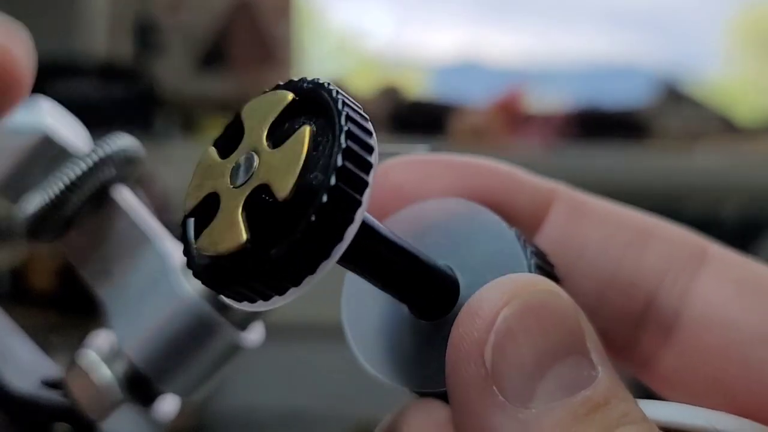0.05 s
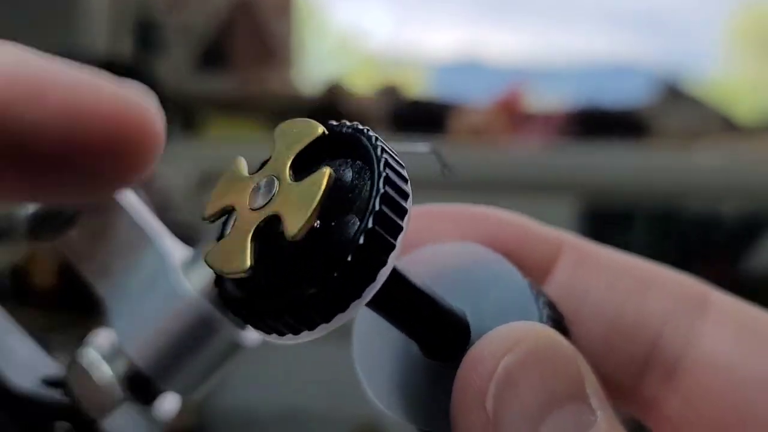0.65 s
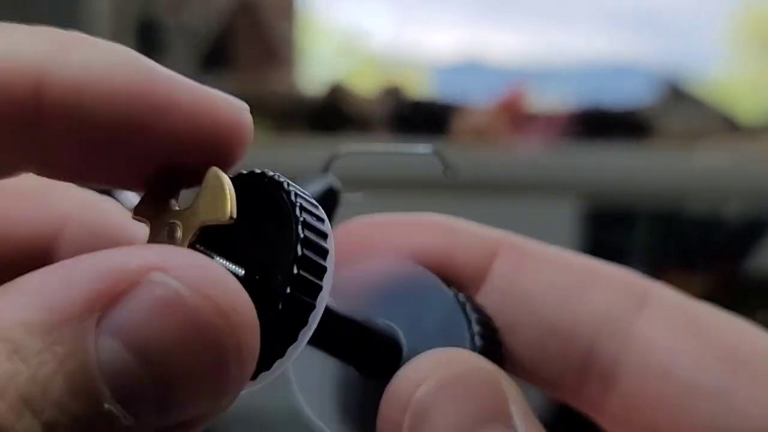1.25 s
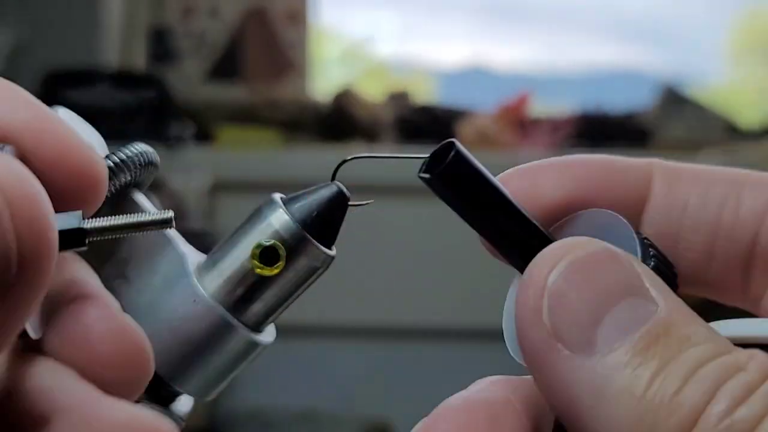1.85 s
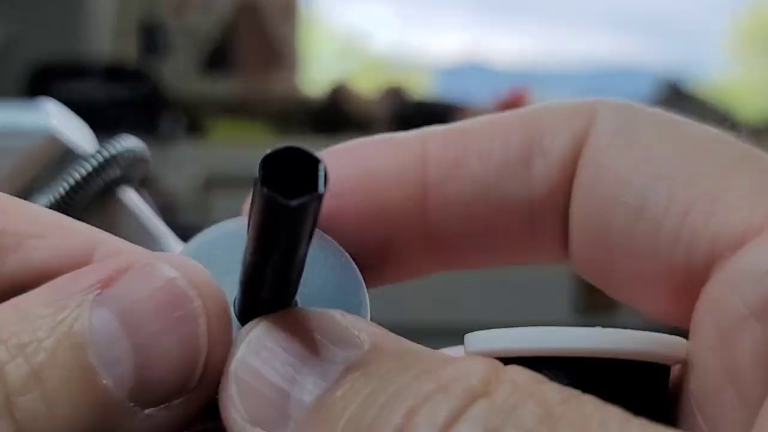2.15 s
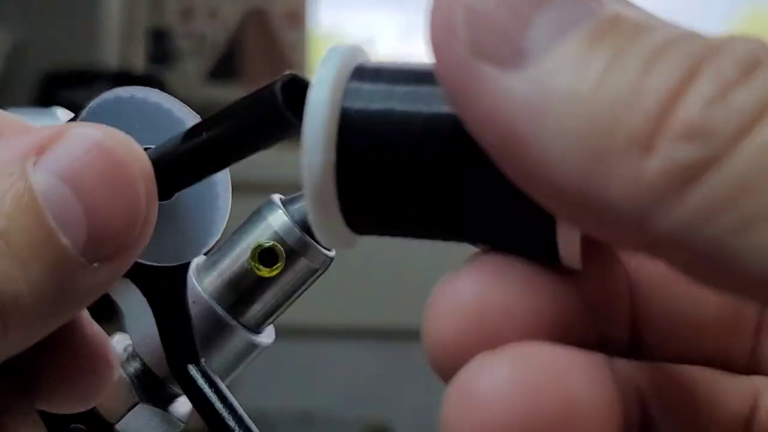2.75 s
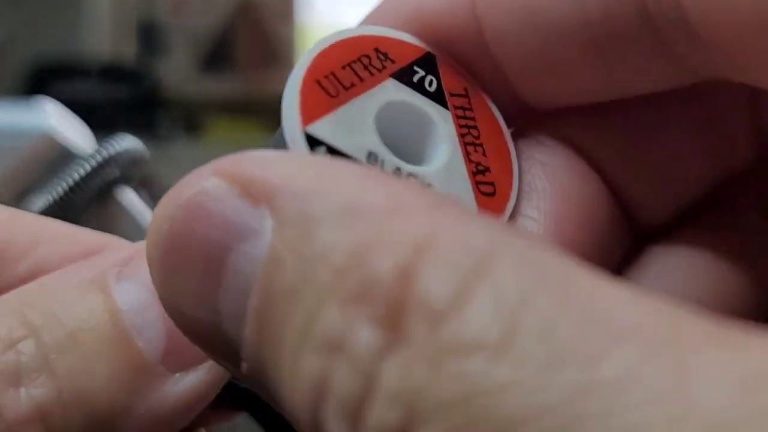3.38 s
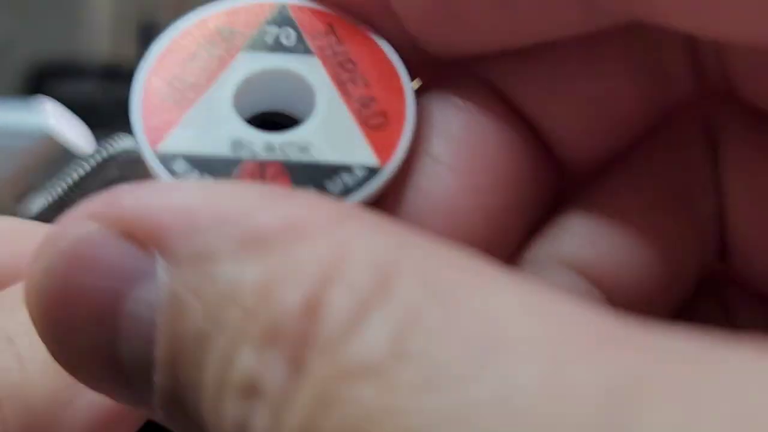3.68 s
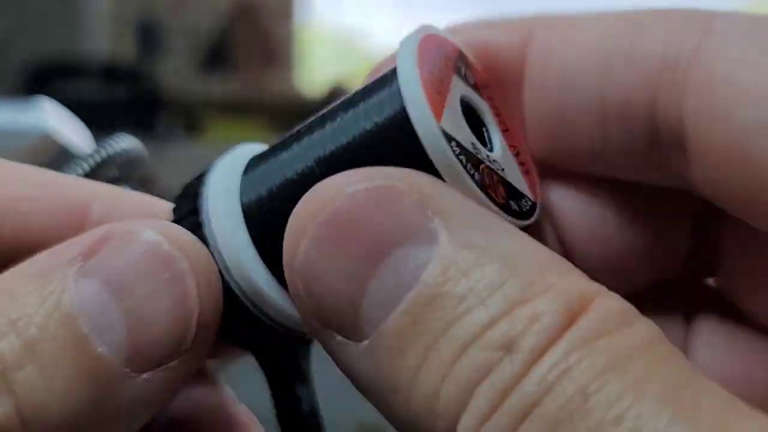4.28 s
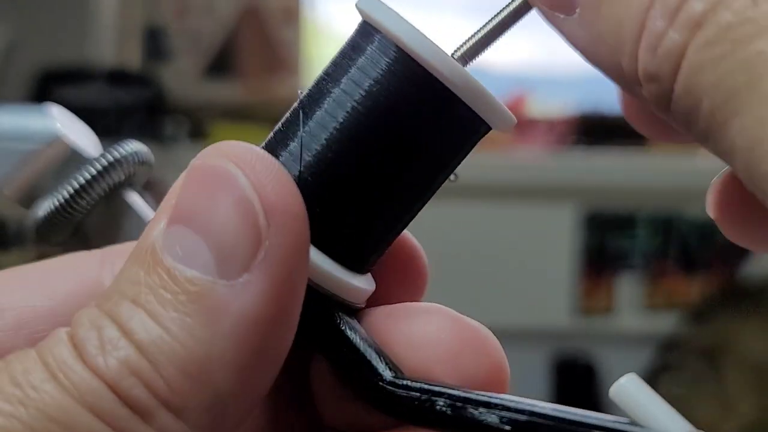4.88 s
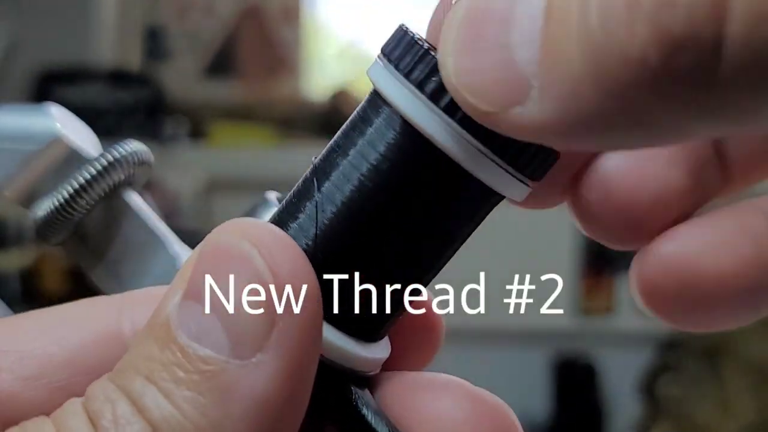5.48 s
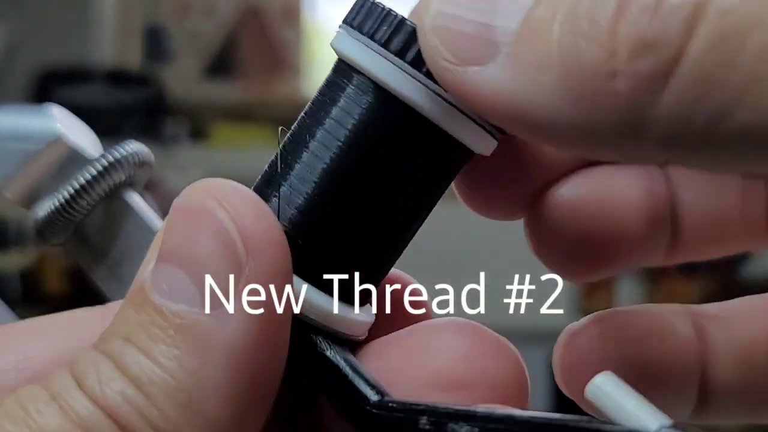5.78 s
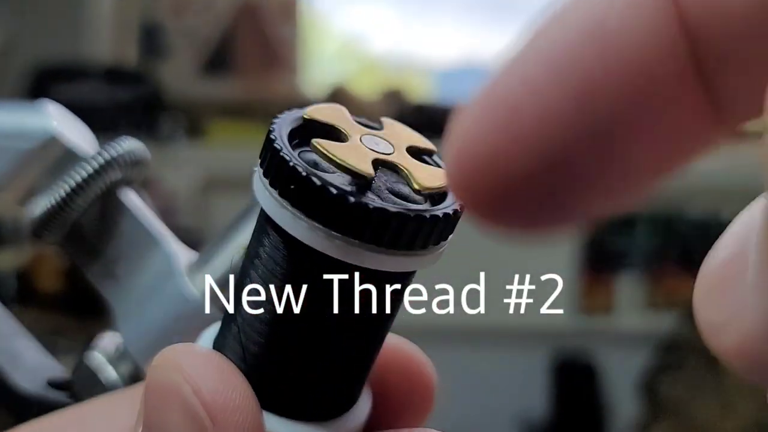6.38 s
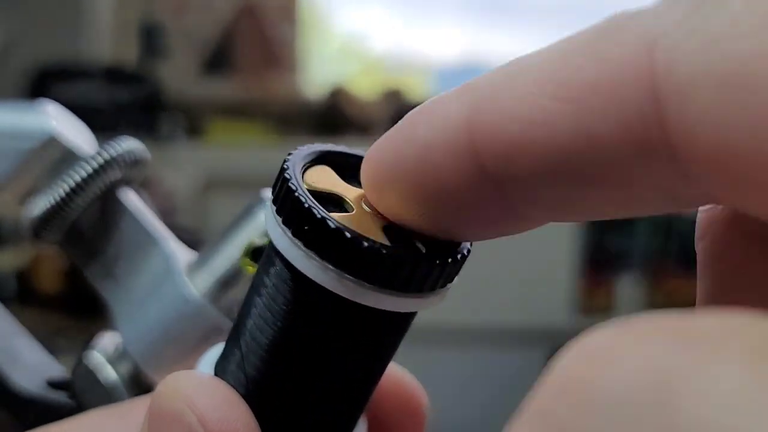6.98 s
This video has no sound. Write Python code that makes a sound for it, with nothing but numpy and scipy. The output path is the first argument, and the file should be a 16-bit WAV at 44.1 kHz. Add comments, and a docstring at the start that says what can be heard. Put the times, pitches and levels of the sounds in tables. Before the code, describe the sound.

Fingers spin a small ridged nut off a thread holder in quick, high, sped-up scratches and ticks, followed by a few tiny metal clicks. The sound drops to normal speed: a hollow plastic spool taps, scrapes onto the shaft and seats with a sharp clack. After a small metal ping, the nut is spun back on in slower, ticking strokes. Everything is close, over a low room hum.

```python
"""Quick, high scratches and ticks sound over a room hum: fingers spin the nut off a small bobbin holder
on a desk. A hollow plastic thread spool scrapes onto the shaft and chatters home, then the nut is spun
back on. Rubbing is noise made of tiny slips; knocks make the parts ring. The first part is sped up,
so hum and scratches sit three times higher; then they drop to true pitch and a thin whine comes in."""
import sys
import numpy as np
from scipy import signal
from scipy.fft import rfft, irfft, next_fast_len
from scipy.io import wavfile
from scipy.ndimage import uniform_filter1d

SR = 44100
rng = np.random.default_rng(int(sys.argv[2]) if len(sys.argv) > 2 else 0)


def wrap_up_sound(samples):
    """Save the sound to the file named by the first command line argument, as 16-bit audio."""
    columns = np.atleast_2d(samples).T
    # keep every value between -1 and 1, then stretch to whole-number steps
    tamed = np.clip(columns, -1, 1)
    steps = np.round(tamed * 32767).astype(np.int16)
    wavfile.write(sys.argv[1], SR, steps)


N = 310199

FAST, FAST_END_S = 3, 2.792  # how many times faster the first part runs, and when it ends
PRESS_S = .007  # a finger presses hardest this long after it catches, at true speed
# finger strokes on the ridged nut: start_s, scratch_db, spin_s (at true speed), thump_db
STROKES = [(0.055, -37, 0.15, -64), (0.1637, -36, 0.18, -41), (.261, -31.5, 0.046, -32.5),
           (0.3568, -36, 0.21, -34), (.447, -31, 0.25, -29), (0.55, -36, 0.073, -34),
           (.669, -46.5, 0.045, -60), (0.761, -37, 0.12, -60), (0.803, -36, .05, -39),
           (.860, -33, 0.066, -54), (0.948, -39, .05, -54), (1.031, -33, 0.17, -33.5),
           (1.1282, -26, 0.25, -56), (1.181, -34.5, 0.18, -56), (1.543, -34, 0.29, -36),
           (1.816, -35, .05, -36), (5.32, -42, 0.08, -48.5), (5.357, -52, 0.091, -36.5),
           (5.653, -45, 0.15, -43.5), (5.945, -40.5, 0.045, -38), (6.231, -44, 0.17, -38),
           (6.493, -40, 0.062, -35), (6.516, -41, 0.18, -42), (6.812, -41.5, 0.074, -40)]


def undb(db):
    """Turn decibels into a gain."""
    return 10 ** (np.asarray(db) / 20)


def unit(x):
    """Scale to an average (rms) level of 1."""
    return x / np.sqrt(np.mean(x ** 2))


def times(length_s):
    """The time of each sample, in seconds."""
    return np.arange(int(length_s * SR)) / SR


def speed_at(s):
    """How fast the scene runs at a moment."""
    return np.where(s < FAST_END_S, FAST, 1)


def add(out, s, x):
    """Mix a stereo sound in at a time."""
    start = max(int(s * SR), 0)
    out[:, start:start + x.shape[1]] += x[:, :max(N - start, 0)]


def colour(x, points, speed=1):
    """Shape the tone by (pitch_hz, level_db) points, moved up by the speed; rms 1."""
    hz, db = np.transpose(points)
    size = next_fast_len(x.shape[-1])
    pitches = np.fft.rfftfreq(size, 1 / SR) / speed + 1e-3
    gain = undb(np.interp(np.log(pitches), np.log(hz), db))
    return unit(irfft(rfft(x, size) * gain, size)[..., :x.shape[-1]])


def drift(per_s):
    """A smooth random wander, roughly 1 up or down."""
    hold = int(SR / per_s)
    steps = np.repeat(rng.standard_normal(N // hold + 1), hold)
    return 1.18 * uniform_filter1d(uniform_filter1d(steps, hold), hold)[:N]


def place(x, pan_db, delay):
    """Place a sound in stereo: the left side is pan_db louder and delay samples later."""
    left, right = np.broadcast_to(x, (2, x.shape[-1]))
    late_left = np.pad(left, (delay, 0))[:len(left)]
    return np.array([late_left * undb(pan_db / 2), right * undb(-pan_db / 2)])


def peak_of(x, window):
    """The rms level of the loudest stretch, window samples long."""
    return np.sqrt(uniform_filter1d(np.mean(x ** 2, 0), size=window, mode="constant").max())


def noise(t, apart=1, shared=1):
    """Stereo hiss: one part differs between the sides, one is shared."""
    return apart * rng.standard_normal((2, len(t))) + shared * rng.standard_normal(len(t))


def friction(t, slips_per_s, spread_db, slip_s=.0024, steady=.4):
    """Sudden slips of unequal size, each a dying puff of noise, over a steady rub."""
    slipping = rng.random(len(t)) < slips_per_s / SR
    slips = slipping * undb(spread_db * np.clip(rng.standard_normal(len(t)), -2, 1.5))
    power = signal.lfilter([1], [1, -np.exp(-2 / (slip_s * SR))], slips ** 2)
    return (unit(np.sqrt(power)) + steady) * noise(t, shared=.36)


def ring(t, modes):
    """A struck part's own tones, or modes (pitch_hz, width_hz, level_db); wider ones die sooner."""
    return sum(undb(db) * np.exp(-np.pi * width * t) * np.cos(2 * np.pi * hz * t) * (-1) ** k
               for k, (hz, width, db) in enumerate(modes))


def resonate(x, modes, speed=1):
    """Let a rubbing noise ring a part's tones; rms 1."""
    ringing = ring(times(.05) * speed, modes)
    return unit(signal.fftconvolve(x, ringing[None], axes=1)[:, :x.shape[1]])


def room_air(tone, db, wide_hz):
    """Fan-like air noise: alike on both sides in the bass, unrelated above wide_hz."""
    mid, side = rng.standard_normal((2, N))
    side = colour(side, [(wide_hz / 4, -9), (wide_hz, -1), (wide_hz * 2, 0)])
    return colour(np.array([mid + side, mid - side]), tone) * undb(db + 1.26 * drift(per_s=2.6))


def mains_hum(t, fast_gain_db=2, stereo_spread=.62, wavers_per_s=10):
    """Mains hum wavers, and throbs slowly against a motor that runs just below it."""
    # hum tones at true speed: pitch_hz, level_db (before the gain), unsteadiness
    tones = [(57, -53.5, .3), (60.02, -50.5, .3), (120.2, -65, .6), (135.5, -66, .4), (168.7, -63, .25),
             (240.3, -61.5, .05), (355, -72.5, .12), (375.4, -71.5, .15)]
    # the hum's rise and fall after the fast part: time_s, gain_db
    swell = [(2.8, -12), (3.1, -10), (3.2, -5), (4.45, -5), (4.65, 2), (5.5, 1.5), (6.5, -1), (7, 1)]
    clock = np.cumsum(speed_at(t)) / SR  # seconds as they pass in the room
    hum = 0
    for hz, db, unsteady in tones:
        # level and phase wander, a little differently on each side
        targets = rng.standard_normal((2, 256)) + 1j * rng.standard_normal((2, 256))
        mid, side = (np.interp(clock * wavers_per_s, np.arange(len(row)), row) for row in targets)
        waver = unsteady * (mid + stereo_spread * np.array([side, -side]))
        hum = hum + undb(db) * unit(np.real((1 + waver) * np.exp(2j * np.pi * hz * clock)))
    return hum * undb(np.where(t < FAST_END_S, fast_gain_db, np.interp(t, *np.transpose(swell))))


def whine(t, pitch_hz=7680):
    """One thin electrical tone, heard after the fast part."""
    level_db = np.interp(t, [2.8, 3.19, 3.24, 4.5, 4.7, 7], [-77, -76, -64, -61, -66.5, -67])
    return unit(np.sin(2 * np.pi * pitch_hz * t)) * undb(level_db) * (t >= FAST_END_S)


def background(t):
    """Air, hum and whine; their level dips briefly as the speed drops."""
    # tone of the sped-up air: pitch_hz, level_db
    fast_tone = [(20, -26), (35, -0.5), (70, -4), (130, 6), (250, 2.5), (400, 3.5), (560, -4), (850, 4.5),
                 (1150, 3.5), (1450, -8.5), (2400, -12.5), (4500, -22), (8000, -23), (15000, -26)]
    # tone of the air at true speed: pitch_hz, level_db
    true_tone = [(25, 7.5), (45, 1), (85, 1.5), (130, 2.5), (190, -10), (290, 0), (390, -2.5), (500, -17),
                 (800, -19), (1300, -64), (3000, -42), (7000, -36.5), (9500, -47), (15000, -40)]
    fast_air = room_air(fast_tone, db=-47, wide_hz=4200)
    true_air = room_air(true_tone, db=-53, wide_hz=1430)
    air = np.where(t < FAST_END_S, fast_air, true_air)
    outside_dip = np.abs(t - FAST_END_S - .004) > .004
    return (air + mains_hum(t) + whine(t)) * uniform_filter1d(outside_dip * 1., 64)


def desk_echo(x, speed, echo_db=-14, fade_s=.14):
    """The desk and nearby walls answer with a short, dull echo."""
    t = times(.3)
    tone = [(200, -12), (2500, -12), (7000, -10), (15000, -24)]
    tail = colour(rng.standard_normal((2, len(t))), tone, speed)
    tail = tail * np.exp(-np.log(1000) * t * speed / fade_s) * (t * speed > .003)
    tail = tail / np.sqrt(np.sum(tail ** 2) / 2)
    return x + undb(echo_db) * signal.fftconvolve(x, tail, axes=1)[:, :N]


def sliding(t):
    """Skin and plastic rub softly as the parts are turned and the spool is guided on."""
    # loudness of the rub: time_s, level_db
    levels = [(0, -82), (1.25, -59), (1.4, -52.5), (4.5, -50.5), (4.7, -57.5), (5.2, -60)]
    # tone of the rub: pitch_hz, level_db
    tone = [(300, 16.5), (900, 5), (1700, 5), (2600, 1), (3400, -0.5), (4500, -4), (7000, -8.5),
            (10000, -19.5), (15000, -14)]
    rub = friction(t, slips_per_s=900, spread_db=4.8, steady=.93)
    rub = np.where(t < FAST_END_S, colour(rub, tone, FAST), colour(rub, tone))
    return rub * undb(np.interp(t, *np.transpose(levels)))


def brushes(sharpness=3.2):
    """Fingertips and spool brush the parts in soft swishes, each around one pitch."""
    # light touches: middle_s, level_db, half_length_s, pitch_hz
    touches = [(1.315, -60.5, .029, 4140), (1.429, -47, 0.0064, 7500), (2.184, -57, 0.027, 3200),
               (3.093, -40.5, 0.016, 1730), (1.95, -52, .012, 5000), (3.373, -44.5, 0.016, 3600),
               (4.284, -46, 0.011, 1430), (4.464, -47.5, 0.0032, 5000)]
    # at true speed the fingertip is heard sweeping back after each stroke
    sweeps = [(s + .13, -68, .017, 13000) for s, *_ in STROKES if s > FAST_END_S]
    out, t = np.zeros((2, N)), times(.4)
    middle = t[-1] / 2
    for s, db, half_s, hz in touches + sweeps:
        rub = friction(t, slips_per_s=530, spread_db=2.6, steady=.91)
        swish = unit(signal.lfilter(*signal.iirpeak(hz, sharpness, fs=SR), rub))
        add(out, s - middle, swish * undb(db) * np.exp(-((t - middle) / half_s) ** 2))
    return out


def contacts(rows, width, scatter, sharpness, order, gain_db=0):
    """A knock scatters briefly inside a part: a broad crack, plus a narrower ring at its own pitch."""
    out, t = np.zeros((2, N)), times(.06)
    for s, db, hz, pan_db, fade_s, ring_gain in rows:
        blow = scatter * noise(t, apart=.7, shared=1.25) * np.exp(-t / fade_s)
        blow[:, 0] = 1  # the first impact
        edges_hz = [hz / (1 + width), min(hz * (1 + width), .42 * SR)]
        crack = signal.sosfilt(signal.butter(order, edges_hz, "band", fs=SR, output="sos"), blow)
        click = crack + ring_gain * signal.lfilter(*signal.iirpeak(hz, sharpness, fs=SR), crack)
        click = click / peak_of(click, window=66) * undb(db + gain_db)
        add(out, s, place(click, pan_db, delay=int(6 / speed_at(s))))
    return out


def metal_clicks(fade_s=.0012, ring_gain=2):
    """Loose metal parts touch with tiny, bright clicks."""
    # touches: start_s, level_db (before the gain), pitch_hz, pan_db
    touches = [(1.2156, -29, 10000, -3), (1.3527, -31, 9600, -15.5), (1.377, -32, 9800, 4),
               (1.5755, -24.5, 10100, 6), (1.7432, -30, 8700, 1), (1.781, -21.5, 13500, -2),
               (1.8118, -26, 9100, -13.5), (1.8225, -23, 9600, -2), (1.978, -25, 8200, 2),
               (1.982, -14, 12800, 3), (2.1068, -24, 11600, 1), (3.338, -37, 6840, -12)]
    rows = [(*touch, fade_s, ring_gain) for touch in touches]
    return contacts(rows, width=.98, scatter=.36, sharpness=15, order=2, gain_db=-5.5)


def taps():
    """Spool, nut and holder bump together with duller knocks."""
    # bumps: start_s, level_db, pitch_hz, pan_db, fade_s, ring_gain
    bumps = [(.357, -36, 2300, 0, .0004, .2), (.357, -34, 4700, 2, .0005, 1),
             (.952, -39, 5000, 8, .0009, 1), (1.981, -33, 4200, 15, .0012, 2),
             (2.1066, -29, 5430, -1, .0011, 3), (2.4035, -31, 2450, -1, .0003, 2.5),
             (3.0803, -23, 1900, -5, .0003, .6), (3.1325, -30, 1700, -6, .0004, 1),
             (3.230, -36, 3380, 4.5, .0008, 12), (3.379, -35, 3200, -5, .002, 1),
             (3.380, -39, 320, 0, .0003, 3), (3.3845, -38, 850, -1, .0003, 1),
             (3.3842, -23, 1670, -1.5, .0002, 25), (4.431, -33, 1660, -4, .0006, 5),
             (4.510, -38.5, 3130, -6.5, .00078, 2), (4.678, -40, 990, 0, .0015, 3),
             (6.230, -30, 1300, -2, .0004, .2), (6.2304, -25.5, 5600, -2, .0006, 7)]
    return contacts(bumps, width=.55, scatter=.22, sharpness=9, order=3)


def shaft_scrape(start_s=3.295, end_s=3.39, level_db=-47.5, rise_s=.03, fall_s=.01):
    """The spool's hole drags over the end of the shaft, which sings until the spool slips on."""
    # tones the scrape rings: pitch_hz, width_hz, level_db
    modes = [(1500, 300, -2), (1980, 120, -5), (3390, 70, 0), (3950, 200, -5), (5370, 100, -6),
             (6680, 100, -8), (9350, 270, -10), (11300, 200, -13)]
    out, t = np.zeros((2, N)), times(end_s - start_s)
    press = np.minimum(t / rise_s, 1) * np.minimum((end_s - start_s - t) / fall_s, 1)
    singing = resonate(friction(t, slips_per_s=900, spread_db=3), modes)
    add(out, start_s, place(singing * press * undb(level_db), pan_db=-4, delay=4))
    return out


def shaft_ping(start_s=4.431, gain_db=-34.5):
    """The bare end of the metal shaft is nicked and rings."""
    out = np.zeros((2, N))
    ping = ring(times(.2), modes=[(4410, 99, -1.5), (6420, 47, 3), (6620, 150, 4)])
    add(out, start_s, place(ping * undb(gain_db), pan_db=-7, delay=0))
    return out


def spool(crack_s=.0021, crack_db=-1.5, ring_db=14.5):
    """The hollow spool chatters home against the washer, cracking and ringing with every blow."""
    # blows: start_s, gain_db
    blows = [(3.9835, -26.4), (3.98552, -15.7), (3.98688, -24.4), (3.98823, -25.3), (3.98977, -27.9),
             (3.996, -36)]
    # the spool's own tones: pitch_hz, width_hz, level_db
    modes = [(270, 250, -22), (520, 200, -29), (760, 170, -17), (1060, 120, -17), (1470, 170, -12),
             (1976, 50, -24), (2335, 220, -11.5), (2509, 22, -31), (3000, 200, -20), (3160, 40, -28),
             (4290, 220, -17), (5001, 22, -36), (5300, 400, -21), (6150, 220, -21), (12600, 300, -27)]
    # tone of the crack: pitch_hz, level_db
    tone = [(150, -2), (500, 0), (1000, 2), (1800, 3), (3000, 3), (5500, 4), (9000, -8), (15000, -16)]
    out, t = np.zeros((2, N)), times(.2)
    for s, db in blows:
        crack = colour(noise(t), tone) * np.exp(-t / crack_s)
        blow = crack * undb(crack_db) + ring(t, modes) * undb(ring_db)
        add(out, s, place(blow * undb(db), pan_db=-2, delay=4))
    return out


def nut_modes(s):
    """A touch rings the nut and, in the fast part, the bare holder that no spool damps yet."""
    # the nut's own tones: pitch_hz, width_hz, level_db
    nut_tones = [(2450, 120, -6), (3260, 110, -1.5), (3610, 130, -5.5), (4270, 130, -5), (4860, 160, -8),
                 (5350, 200, -2.5), (5950, 250, -2.5), (8480, 250, -7)]
    # the holder's own tones: pitch_hz, width_hz, level_db
    holder_tones = [(1500, 180, -8), (1730, 140, -7)]
    return list(nut_tones) + (list(holder_tones) if s < FAST_END_S else [])


def spin_db(left_s, level_db=-44.5, at_left_s=.19, steepness=1.16):
    """Friction slows the free nut evenly, so it gets quieter as its time runs out."""
    return level_db + 20 * steepness * np.log10(np.maximum(left_s, 1e-6) / at_left_s)


def rattles(count=10, per_s=55, over_spin_db=4, spread_db=2.5, pan_db=-3):
    """List the ticks of the spinning nut as it knocks on its thread at random moments."""
    rows = []
    for s, _, spin_s, _ in STROKES:
        moments = PRESS_S + np.cumsum(rng.exponential(1 / per_s, size=count))
        for after_s, luck in zip(moments, rng.standard_normal(count)):
            db = spin_db(spin_s - after_s) + over_spin_db + spread_db * luck
            rows.append((s + after_s / speed_at(s), db, pan_db))
    return rows


def nut_ticks(snap_s=.0006, ring_db=-12, spread_db=3, lowest_hz=1350):
    """Each tick is a thin, dry snap that rings the nut's tones in a different mix."""
    # the ridges catch and the nut knocks on its screw: start_s, level_db, pan_db
    knocks = [(0.0541, -32, 3), (0.0699, -34, -3), (0.1644, -29, -11), (0.1678, -33, -6), (0.261, -28, -1),
              (0.2671, -30, -7), (0.3571, -24, -1), (0.3615, -30, -3), (0.4445, -32, -3),
              (0.4509, -25, -14), (0.4549, -31, -2), (0.5556, -33, -8), (0.7626, -32, -4),
              (0.8023, -22.5, -4), (0.8623, -31, -4), (0.8703, -33, -3), (0.945, -34, -3),
              (0.9525, -22, -3), (1.034, -28, -4), (1.129, -24, -2), (1.1846, -32, 0), (1.5403, -33, -7),
              (1.5449, -27, 0), (1.5688, -33, 0), (1.8209, -27, -6), (5.3212, -34, 2), (5.3306, -38, 1),
              (5.3391, -42, -8), (5.3583, -40, 0), (5.3653, -36, -13), (5.6529, -26, -5), (5.6625, -28, -6),
              (5.6696, -38, -1), (5.6745, -34, -3), (5.6808, -38, -3), (5.9419, -27, -1), (5.9537, -35, -1),
              (5.9602, -31, -9), (5.9665, -38, -3), (5.9726, -41, -6), (6.2303, -20, 1), (6.2523, -39, -5),
              (6.2687, -36, -5), (6.2758, -36, -4), (6.282, -39, 3), (6.4901, -34, -1), (6.5012, -31, 0),
              (6.5122, -25.5, -12), (6.5237, -31, -4), (6.5343, -34, -4), (6.5694, -40, -3),
              (6.5775, -40, -6), (6.611, -42, 2), (6.6229, -45, -3), (6.688, -44, -4), (6.816, -34, 0),
              (6.826, -31, -11), (6.834, -39, -4), (6.8441, -43, -3)]
    # tone of the snap: pitch_hz, level_db
    tone = [(300, -14), (1800, -8), (2600, 1), (4300, 0), (5900, 1), (6900, -9), (8500, -5), (10000, -17),
            (15000, -17)]
    out, t = np.zeros((2, N)), times(.03)
    for s, db, pan_db in list(knocks) + rattles():
        speed = speed_at(s)
        snap = colour(noise(t, apart=.5), tone, speed) * np.exp(-t * speed / snap_s)
        modes = [(hz, width, mode_db + spread_db * rng.standard_normal())
                 for hz, width, mode_db in nut_modes(s)]
        # so small a part gives off hardly any bass
        low_cut = signal.butter(4, lowest_hz * speed, "high", fs=SR, output="sos")
        tick = signal.sosfilt(low_cut, snap + ring(t * speed, modes) * undb(ring_db))
        tick = tick / peak_of(tick, window=30) * undb(db)
        add(out, s, place(tick, pan_db, delay=int(8 / speed)))
    return out


def nut_strokes(turns_per_s=32, wobble_depth=.24, thump_hz=80, thump_s=.0087):
    """A finger scrapes the ridges and jolts the holder; the nut spins on, wobbling once a turn."""
    # tone of skin scraping the ridges: pitch_hz, level_db
    scratch_tone = [(300, -7), (1100, -10), (1700, 0.5), (2400, -3.5), (3300, 7), (4300, 0), (5500, 2.5),
                    (6500, -1), (7500, -1), (9200, -1), (10500, -7), (15000, -15)]
    # tone of the spinning hiss, with the treble cut away above 9 kHz: pitch_hz, level_db
    hiss_tone = [(300, -25), (1200, 2), (2000, 7.5), (3300, 8), (5500, 5.5), (7000, 3), (9000, 12),
                 (10000, -9), (12000, -3), (15000, -12)]
    swell_s, fade_s, slips_per_s, slip_s = .008, .023, 550, .0008  # at true speed
    scratch_ring, spin_ring = .7, 1.8  # amount of ringing against plain rubbing
    out, lead_s = np.zeros((2, N)), .05
    for s, scratch_db, spin_s, thump_db in STROKES:
        speed, modes = speed_at(s), nut_modes(s)
        t = (times(.4) - lead_s) * speed - PRESS_S  # zero at the hardest press
        press = np.exp(np.minimum(t, 0) / swell_s - np.maximum(t, 0) / fade_s)
        grit = friction(t, slips_per_s * speed, spread_db=4, slip_s=slip_s / speed, steady=.3)
        rasp = colour(grit, scratch_tone, speed) + scratch_ring * resonate(grit, modes, speed)
        scratch = unit(rasp) * press * undb(scratch_db)

        coast = (t > 0) * undb(spin_db(spin_s - t))
        wobble = 1 + wobble_depth * np.sin(2 * np.pi * turns_per_s * t + rng.uniform(0, 2 * np.pi))
        rub = friction(t, slips_per_s * speed, spread_db=.86, slip_s=slip_s / speed)
        rub = colour(rub, hiss_tone, speed)
        spin = unit(rub + spin_ring * resonate(rub, modes, speed)) * coast * wobble

        thump = np.sin(2 * np.pi * thump_hz * t) * np.exp(-np.abs(t) / thump_s) * undb(thump_db)
        add(out, s - lead_s, place(scratch + spin + thump, pan_db=-2.5, delay=int(10 / speed)))
    return out


def scene():
    """All the handling, its echo and the room."""
    t = np.arange(N) / SR
    handling = metal_clicks() + taps() + nut_strokes() + nut_ticks()
    handling += spool() + shaft_ping() + shaft_scrape() + brushes() + sliding(t)
    fast_part = desk_echo(handling * (t < FAST_END_S), speed=FAST)
    true_part = desk_echo(handling * (t >= FAST_END_S), speed=1)
    return fast_part + true_part + background(t)


def record(dry):
    """Remove the lowest rumble and the highest treble."""
    low_hz, top_hz = 22, 15400
    dry = signal.sosfilt(signal.butter(2, low_hz, "high", fs=SR, output="sos"), dry)
    return signal.sosfilt(signal.ellip(10, .2, 80, top_hz, fs=SR, output="sos"), dry)


dry = scene()
out = record(dry)
wrap_up_sound(out)
```